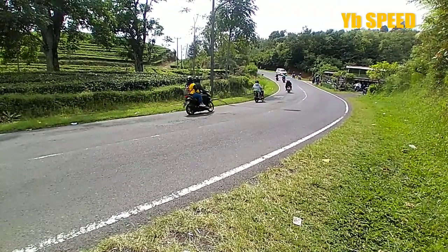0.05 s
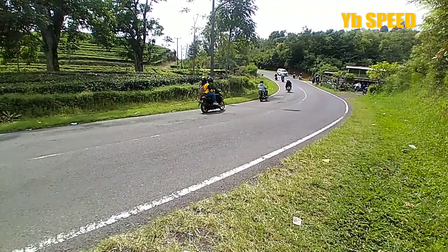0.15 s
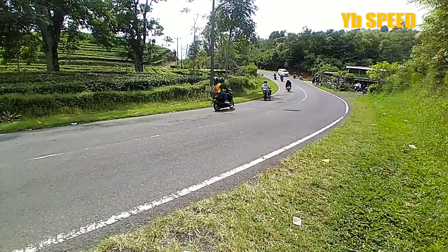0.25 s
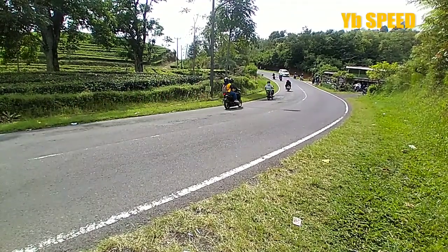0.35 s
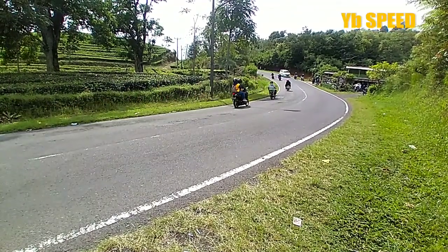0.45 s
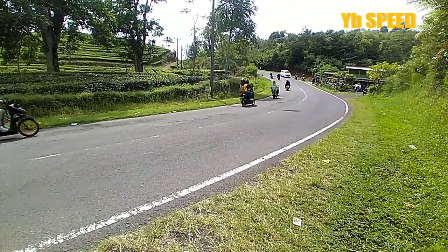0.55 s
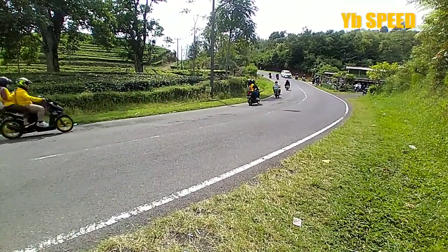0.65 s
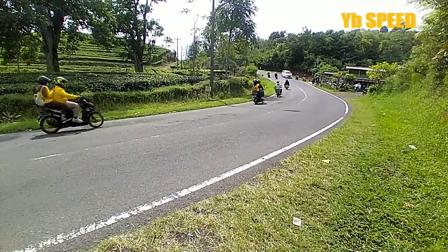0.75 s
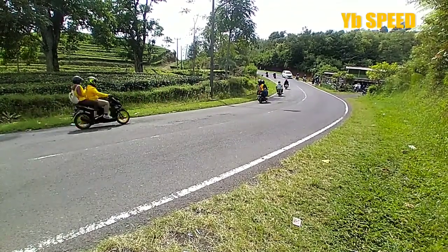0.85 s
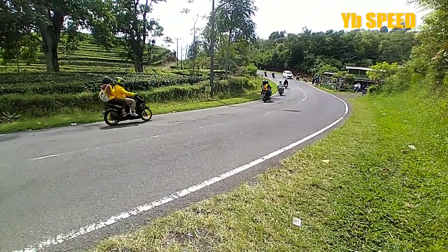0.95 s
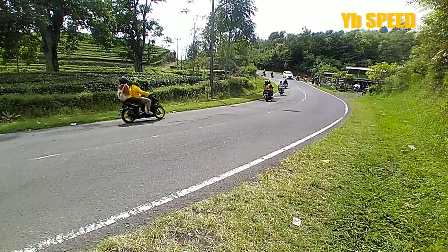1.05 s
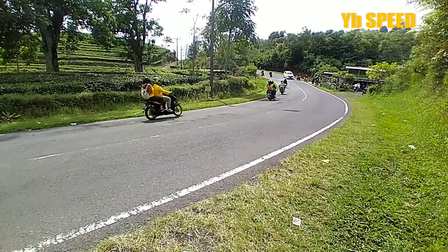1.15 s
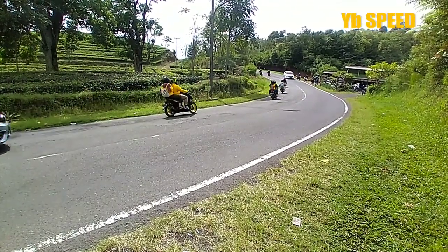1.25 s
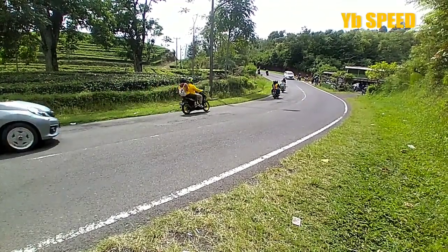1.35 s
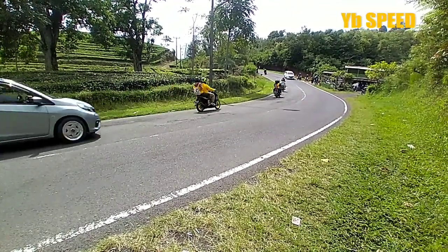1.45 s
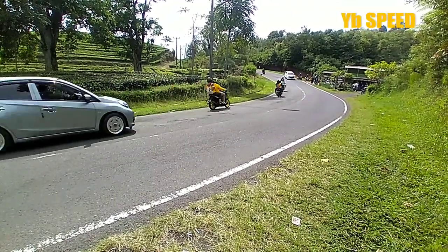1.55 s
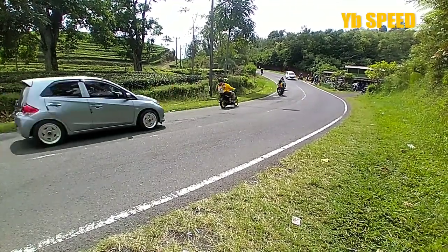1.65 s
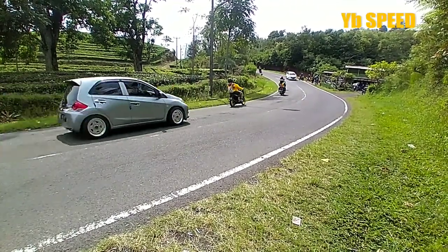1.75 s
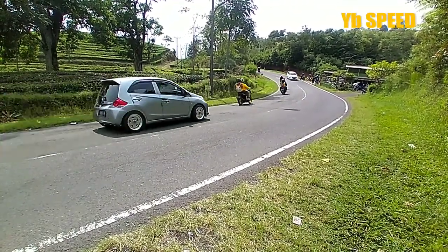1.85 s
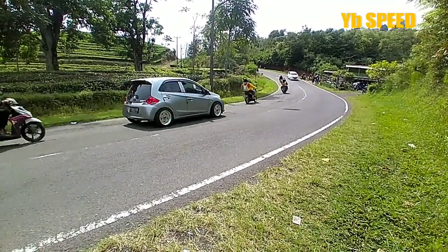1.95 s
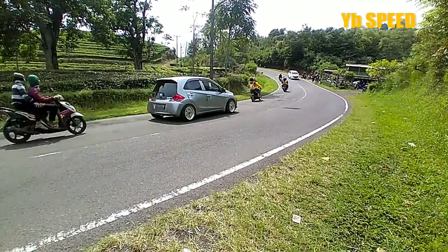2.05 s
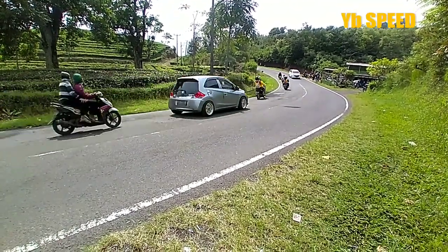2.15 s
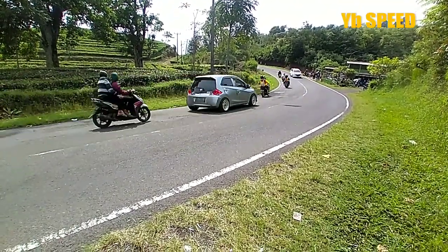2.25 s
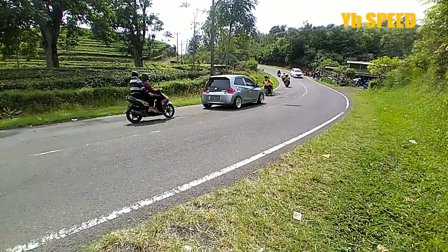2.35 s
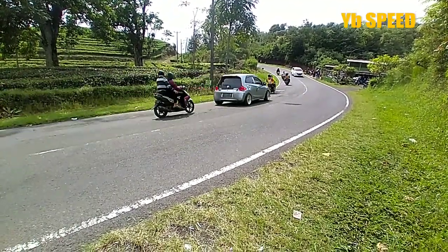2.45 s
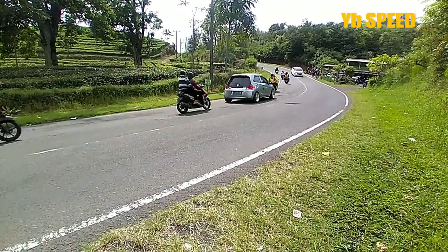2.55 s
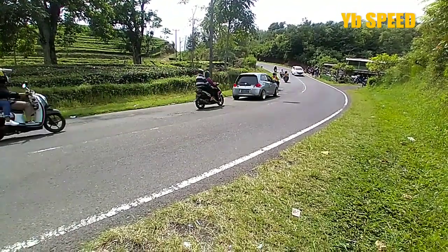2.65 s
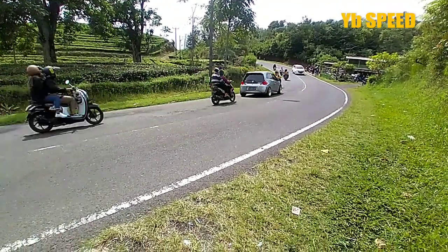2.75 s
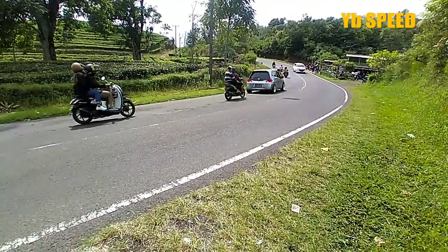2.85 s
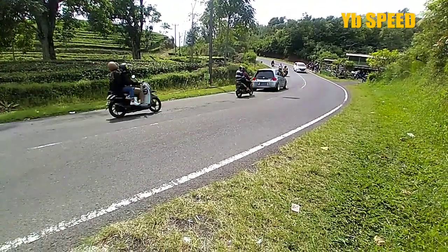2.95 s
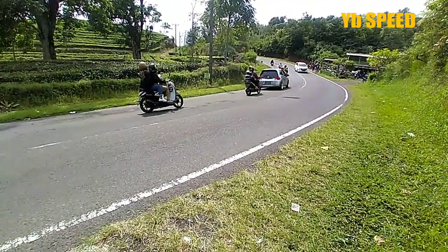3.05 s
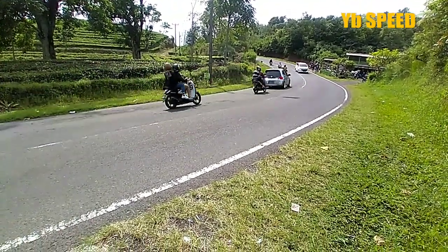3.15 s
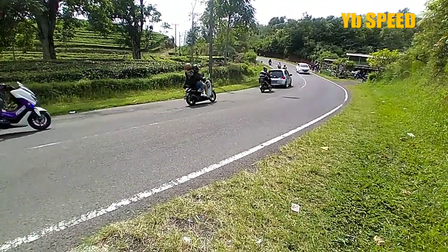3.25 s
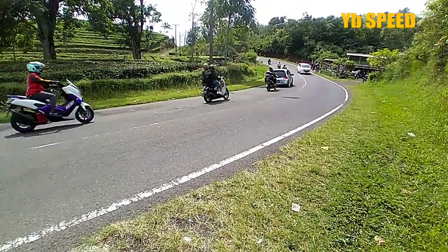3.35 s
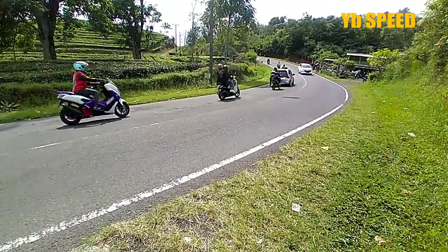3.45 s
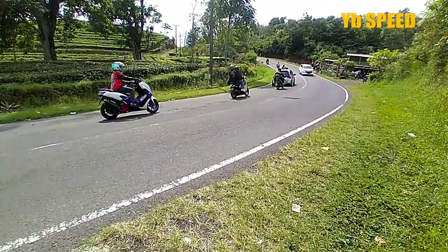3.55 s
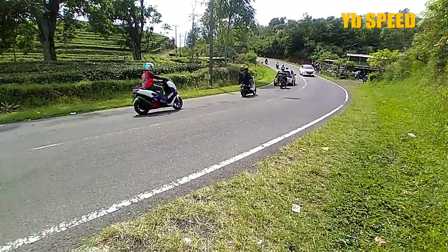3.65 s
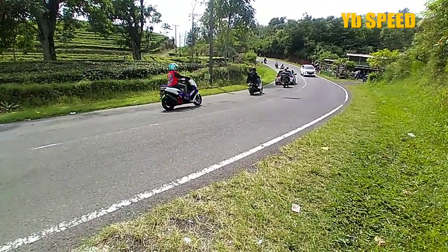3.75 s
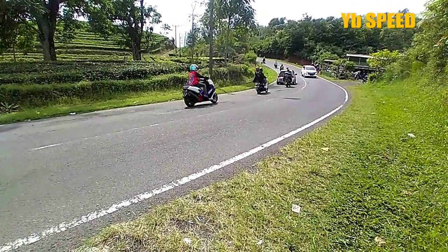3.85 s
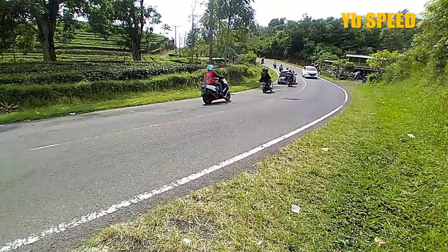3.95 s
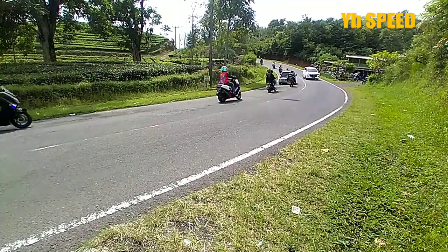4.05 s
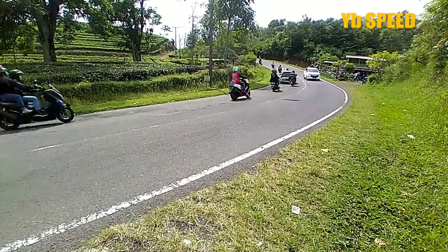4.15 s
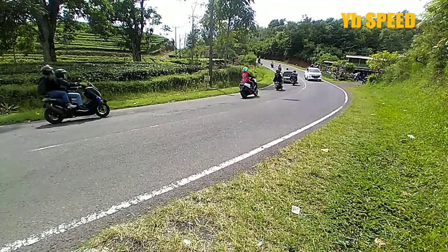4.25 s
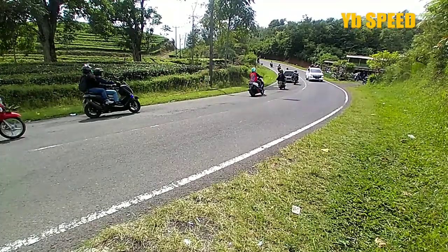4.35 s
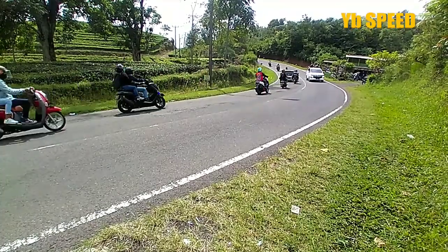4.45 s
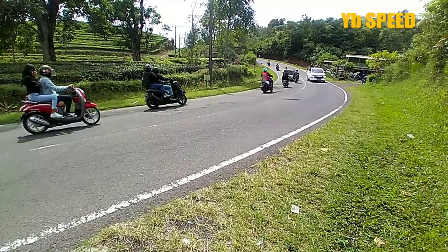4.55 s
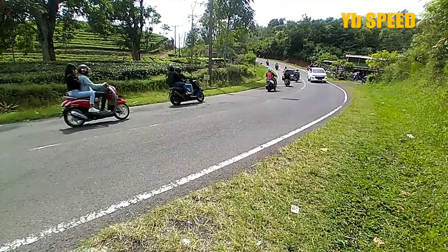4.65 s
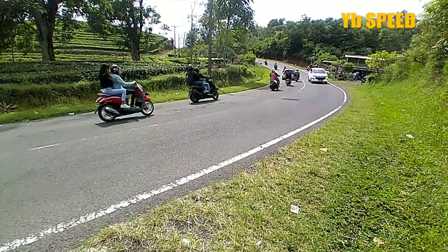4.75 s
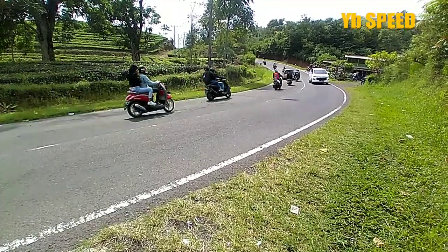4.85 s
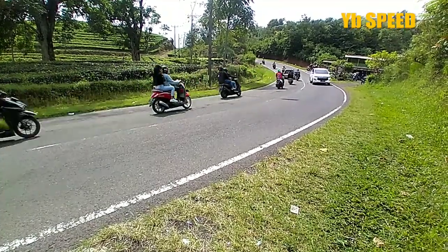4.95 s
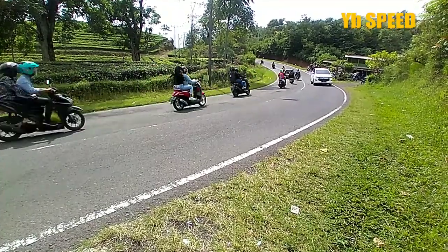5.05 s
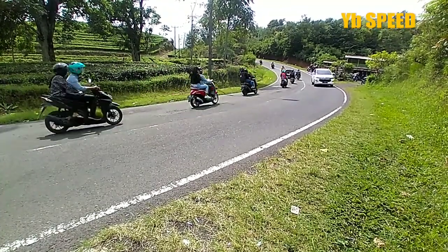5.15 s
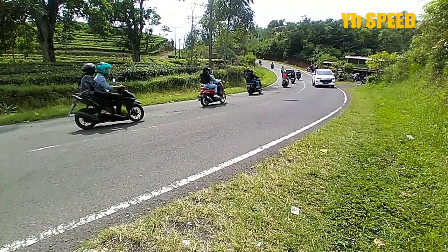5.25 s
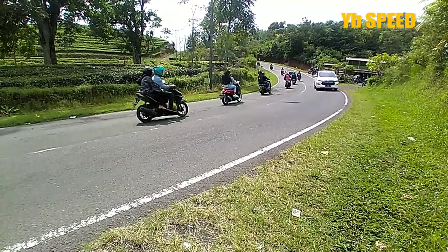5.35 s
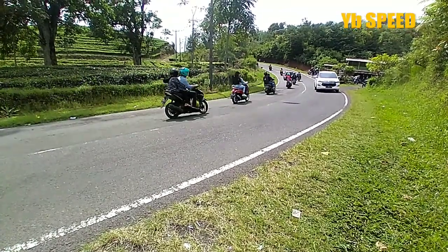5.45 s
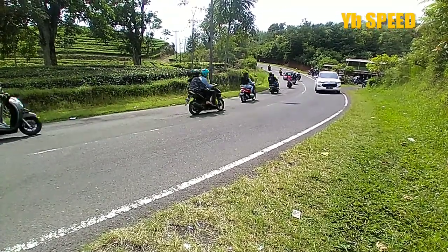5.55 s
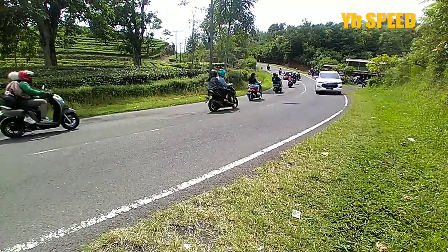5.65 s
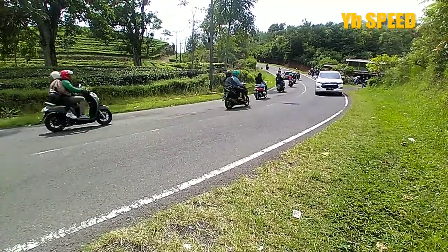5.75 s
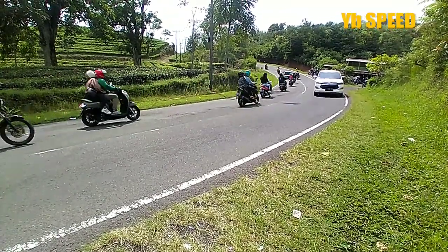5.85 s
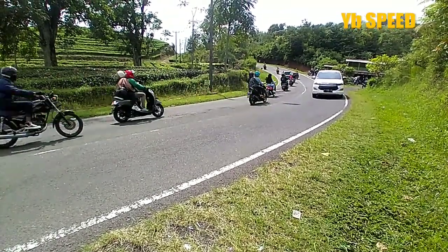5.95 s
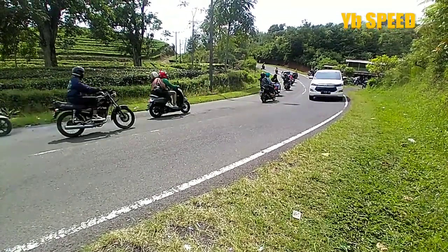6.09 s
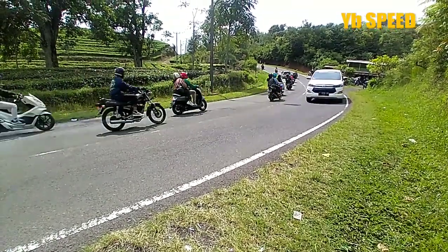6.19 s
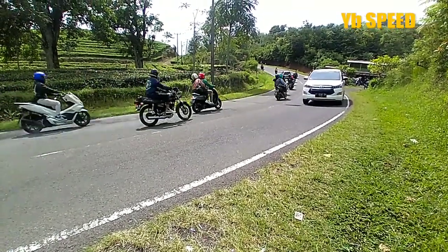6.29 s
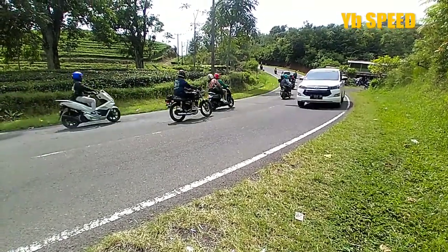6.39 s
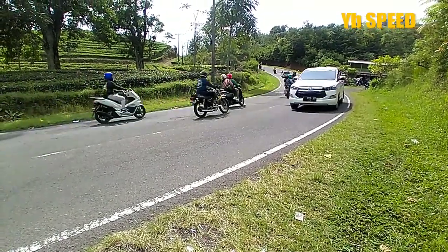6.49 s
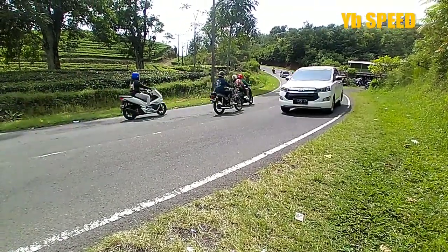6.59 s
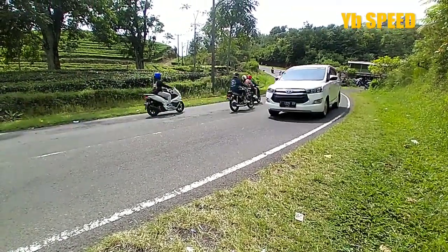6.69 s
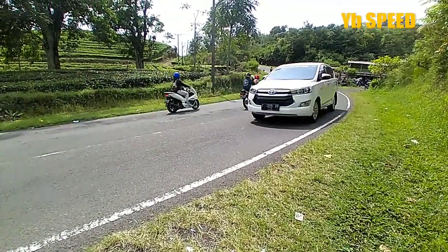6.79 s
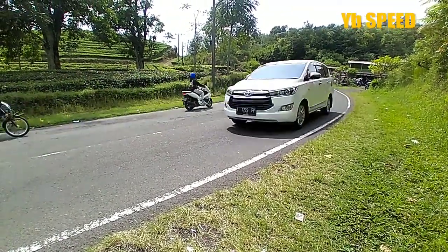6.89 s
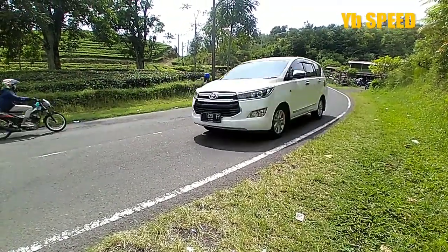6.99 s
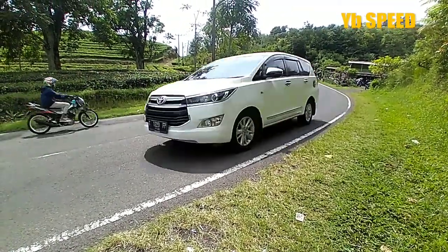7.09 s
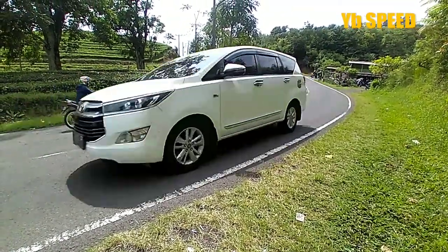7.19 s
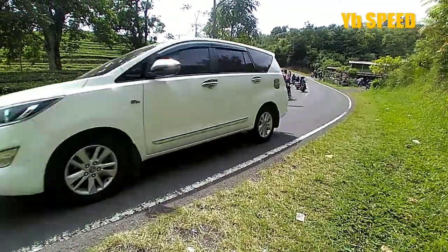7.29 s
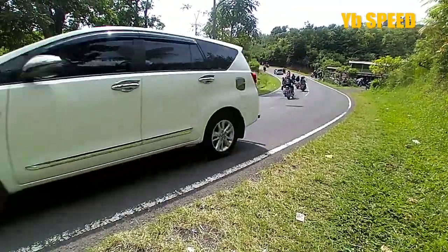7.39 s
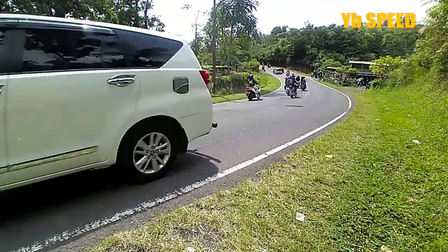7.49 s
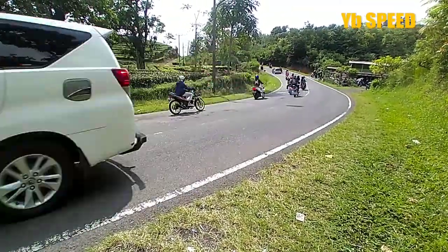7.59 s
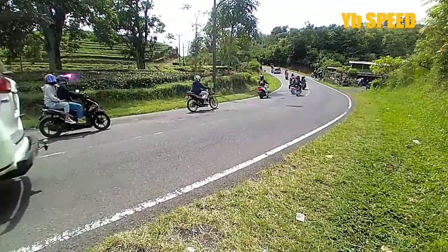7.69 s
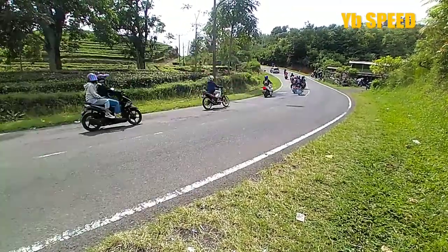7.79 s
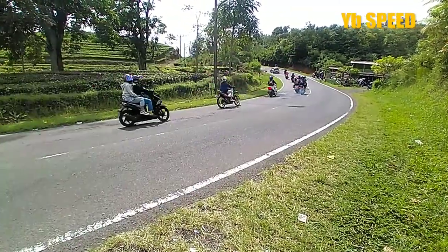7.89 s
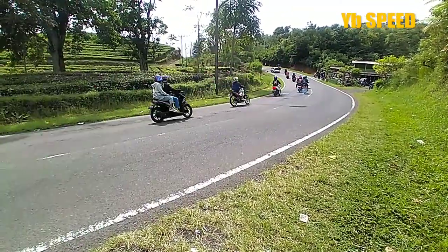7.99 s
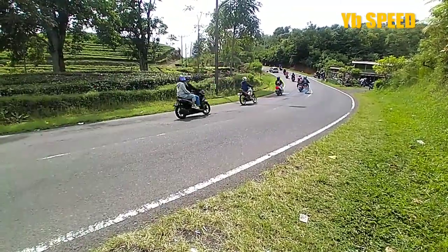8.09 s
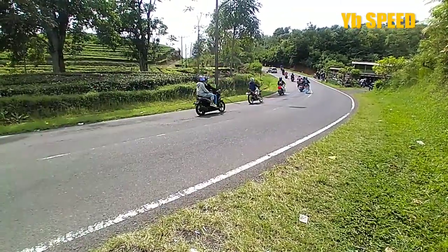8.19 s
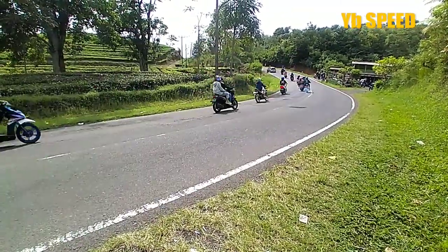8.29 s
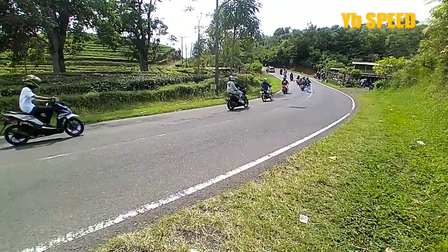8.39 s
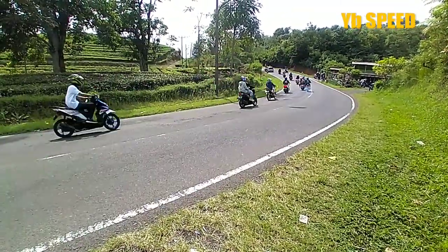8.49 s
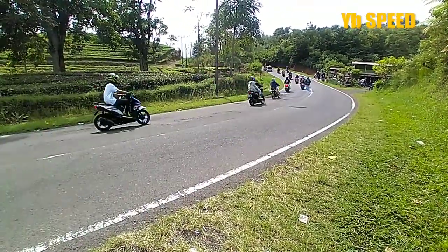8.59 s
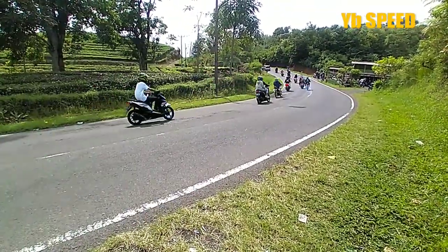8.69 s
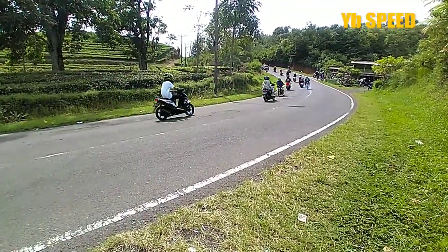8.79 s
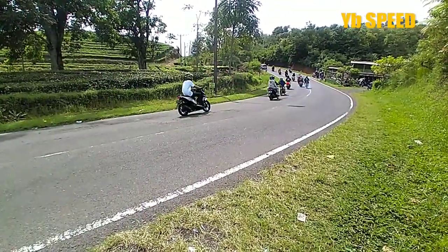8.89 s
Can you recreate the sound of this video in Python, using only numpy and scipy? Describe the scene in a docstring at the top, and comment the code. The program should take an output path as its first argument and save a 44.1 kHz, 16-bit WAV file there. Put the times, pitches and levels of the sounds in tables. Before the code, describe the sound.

Motorcycles and cars pass a roadside bend with swelling tyre hiss, then two loud single-cylinder motorcycles thump by close.

```python
"""Traffic at a roadside bend

Scooters, motorcycles and two cars pass a few metres from a pocket microphone with two ports (openings).
Two loud one-cylinder exhausts thump over distant ones, each firing making the pipe ring.
Road noise roars and hisses, coloured by each port, its narrow bands flickering in and out.
The bank behind scatters the bass."""
import sys
import numpy as np
from scipy import signal
from scipy.fft import rfft, irfft
from scipy.io import wavfile
from scipy.ndimage import uniform_filter1d

SR = 44100
rng = np.random.default_rng(int(sys.argv[2]) if len(sys.argv) > 2 else 0)


def store_pcm(level_fs):
    """Save levels as 16-bit WAV."""
    pcm = np.round(np.clip(level_fs, -1, 1) * 32767).astype(np.int16)
    wavfile.write(sys.argv[1], SR, np.atleast_2d(pcm).T)


N = 393813

# The second loud exhaust: (time [s], firing rate [Hz], level [dB], low ring centre [Hz],
# upper ring over level [dB], upper ring centre [Hz], boom over level [dB])
SECOND_ENGINE = [(7.1, 47.7, -37, 132, -25, 340, -34), (7.246, 47.63, -30, 130, -28, 445.5, -1),
                 (7.338, 49.34, -13.5, 150.5, -42, 596, -33), (7.42, 48.47, -22, 150, -40, 550, -14),
                 (7.538, 46.63, -20.5, 205, -17, 260, -26), (7.614, 46.54, -15.5, 145, -23, 298, -9),
                 (7.69, 46.23, -21, 162, -25, 300, -1.5), (7.79, 45.7, -22.5, 127, -37, 450, -9),
                 (7.85, 46.77, -17.5, 131, -45, 480, -22), (7.97, 45.05, -15, 160.2, -32, 262, -17),
                 (8.016, 45.28, -14, 152.5, -18.5, 450, -26), (8.1, 45.1, -12.5, 133.4, -32, 480, -26),
                 (8.24, 44.79, -16, 139.1, -11, 476.6, -11), (8.3, 44.76, -14, 146, -13, 473, -12),
                 (8.36, 44.15, -15, 143, -7.5, 346, -6), (8.454, 44.15, -17, 160, -5.5, 278, -6),
                 (8.58, 43.98, -15, 146, -14, 390, -10), (8.64, 43.28, -16, 154, -3, 253, -10),
                 (8.88, 44.33, -17.5, 174, 2, 270, -12), (8.93, 46.2, -18.5, 179.5, 3, 262.3, -9)]
# Swirling gas against the firings in each loud exhaust: (first [ratio], second [ratio])
GAS_SHARES = [.4, .28]


def undb(db):
    """Turn decibels into a gain."""
    return 10 ** (np.asarray(db) / 20)


def unit(x):
    """Scale to an average power of 1."""
    return x / np.sqrt(np.mean(x ** 2))


def curves(table):
    """A gate that is open while the table lasts, and its columns at every sample."""
    times, *columns = np.transpose(table)
    t = np.arange(N) / SR
    gate = uniform_filter1d(1. * ((t >= times[0]) & (t <= times[-1])), SR // 20, mode="nearest")
    return gate, [np.interp(t, times, column) for column in columns]


def band(x, lo_hz, hi_hz, order=2):
    """Keep what lies between two frequencies."""
    return signal.sosfilt(signal.butter(order, [lo_hz, hi_hz], "bandpass", fs=SR, output="sos"), x)


def shaped(x, points):
    """Colour a sound by (frequency [Hz], gain [dB]) points."""
    hz, db = np.transpose(points)
    f = np.maximum(np.fft.rfftfreq(N, 1 / SR), 1)
    return irfft(rfft(x) * undb(np.interp(np.log(f), np.log(hz), db)), N)


def walk(rate):
    """Glide to a new random value rate times a second; the spread is near 1."""
    return np.interp(np.arange(N) * rate / SR, np.arange(200), rng.standard_normal(200)) * 1.2


def firings(hz, jitter, scatter_db):
    """One pulse a cycle, uneven in timing and size; also the place in the cycle, 0 to 1."""
    turns = np.cumsum(hz) / SR
    starts = np.flatnonzero(np.diff(np.floor(turns)))
    timing, size = rng.standard_normal((700, 2))[:len(starts)].T
    starts += (jitter * timing * SR / hz[starts]).astype(int)
    pulses = np.zeros(N)
    pulses[np.clip(starts, 0, N - 1)] = undb(scatter_db * size)
    return pulses, turns % 1


def add_burst(out, start_s, db, t60, hz=None):
    """Add a sharp rise that fades 60 dB in t60 seconds; with hz, it carries a tone."""
    t = np.arange(SR // 5) / SR
    shape = np.exp(-np.log(1000) * t / t60) * (1 - np.exp(-t / 0.00054))
    tone = 1 if hz is None else np.sin(2 * np.pi * hz * t)
    i = int(start_s * SR)
    out[i:i + len(t)] += undb(db) * shape * tone


def traffic_rumble():
    """Distant traffic blurs into a low, gently wavering noise."""
    # Tone of the rumble: (frequency [Hz], relative level [dB])
    colour = [(15, -59), (25, -35), (91, -2), (139, -9), (171, 0), (205, -8), (436, -16), (700, -18.5),
              (910, -80), (1540, -120)]
    return undb(-41.5 + .8 * walk(6)) * unit(shaped(rng.standard_normal(N), colour))


def far_engines():
    """Steady firings, dulled by distance."""
    # One list for each engine: (time [s], firing rate [Hz], level [dB])
    engines = [
        [(0, 58.2, -45.5), (.6, 57.4, -46.5), (1.1, 59.24, -46), (2.2, 60.04, -49.5), (2.8, 59, -58)],
        [(2.4, 50, -83), (3, 52.1, -45.5), (3.7, 55.4, -46), (4.2, 59.37, -45), (4.7, 62.55, -42),
         (5.4, 64, -41.5), (5.9, 62.2, -46)],
        [(1.8, 39, -58), (2.2, 38.2, -74), (3.5, 38.66, -69), (4.5, 38.9, -53), (5.5, 38.7, -68),
         (5.8, 38, -58)],
        [(5.7, 36.24, -26.5), (6, 36.06, -26.5), (6.4, 36.05, -47), (6.8, 36.54, -37.5), (7.1, 36.4, -42.5),
         (7.4, 36.7, -57)],
    ]
    # Tone of a distant exhaust pipe: (frequency [Hz], relative level [dB])
    pipe = [(40, -30), (75, -4), (120, -3), (180, 0), (300, -2), (480, -7), (700, -20), (1100, -50),
            (2000, -120)]
    out = 0
    for engine in engines:
        gate, (hz, db) = curves(engine)
        pulses, _ = firings(hz, jitter=0.00087, scatter_db=2.0)
        out += gate * undb(db) * unit(shaped(pulses, pipe))
    return out


def tyre_swells():
    """Swells of tyre noise as traffic passes; their powers add, and the loudest set side and centres."""
    # (loudest at [s], fade time [s], roar [dB], whir [dB], rattle [dB], hiss [dB],
    # twice the left-minus-right level [dB], roar centre [Hz], rattle centre [Hz])
    swells = [(0, 0.18, -46, -56, -46, -31.5, 9.5, 1110, 4900),
              (.4, 0.14, -49, -59, -50, -38, 13, 1090, 4200),
              (0.885, 0.12, -45.5, -51, -46.5, -31.5, 1.5, 1050, 5800),
              (1.22, 0.73, -43, -50, -46, -39.5, 9, 1060, 4400),
              (1.64, 0.26, -42.5, -43, -31.5, -32.5, 0, 1010, 4300),
              (1.9, 0.27, -44, -37.5, -36, -28.5, -3.5, 1050, 4100),
              (2.22, 0.42, -35, -56, -34, -32, -4, 1080, 4700),
              (2.49, 0.22, -59, -43, -48, -26, 0, 1110, 5100),
              (3.06, 0.39, -39, -39.5, -42.5, -30.5, -0.5, 1130, 5050),
              (3.36, 0.15, -39.5, -41, -41, -34, -7, 1280, 4000),
              (3.64, 0.25, -35.5, -48, -40, -36, 2, 1230, 4600),
              (3.961, 0.19, -38, -34.5, -59, -32, -3.5, 1280, 4130),
              (4.2, 0.33, -34.5, -40.5, -46.5, -37, 0.5, 1060, 5200),
              (4.7, 0.81, -37, -36.5, -43, -30, -0.5, 1140, 5060),
              (5.17, 0.19, -32, -37, -35.5, -31, 1, 1300, 3030),
              (5.64, 0.32, -36, -33, -32.5, -23, -2.5, 1180, 3230),
              (6.1, 0.23, -37, -39, -35.5, -27, -1.5, 1190, 3440),
              (6.42, 0.18, -38.5, -64, -40, -28.5, 1.5, 869.6, 5100),
              (6.64, 0.36, -45, -39.5, -40, -26, -0.5, 890, 5645),
              (7.048, 0.29, -47.5, -64, -45.5, -29.5, -1, 1080, 6050),
              (7.418, 0.19, -32.5, -45, -68, -52, 3.5, 830, 5500),
              (7.691, 0.21, -37, -42.5, -38.5, -28, 2, 920, 5800),
              (7.98, 0.22, -43.5, -52, -43, -35, -1, 1340, 5500),
              (8.28, 0.16, -41, -41.5, -40, -32, 8, 1390, 5450),
              (8.5, 0.15, -39.5, -41, -41, -46, 3, 700, 5650),
              (8.78, 0.18, -39.5, -39.5, -42, -38, 0, 725, 5100)]
    # The road between swells: (roar [dB], whir [dB], rattle [dB], hiss [dB])
    background_db = [-71, -56.5, -57, -46]
    peak_s, fade_s, *zones_db, side_db, roar_hz, rattle_hz = np.transpose(swells)[:, :, None]
    t = np.arange(0, N + 256, 256) / SR
    width_s = np.where(t < peak_s, 0.53 * fade_s, fade_s)  # rises quicker than it fades
    shape = (1 + ((t - peak_s) / width_s) ** 2) ** -1.966
    power = undb(2 * np.array(zones_db)) * shape
    mean = lambda value, weight: (value * weight ** 2).sum(0) / (weight ** 2).sum(0)
    gains = np.sqrt(power.sum(1) + undb(2 * np.array(background_db))[:, None])
    rows = [*gains, mean(side_db, power.sum(0)), mean(roar_hz, power[0]), mean(rattle_hz, power[2])]
    return [np.interp(np.arange(N) / SR, t, row) for row in rows]


def port_noise():
    """Left and right noise: the hollow of each port passes its resonances and little between them."""
    # Resonances of each port: (frequency [Hz], width [Hz], gain [dB])
    left_modes = [(770, 210, -5), (1094, 435, -1.5), (1710, 640, -5.5), (2284, 320, -3), (3084, 630, -6),
                  (4600, 3300, -18), (9350, 700, 5.5), (10770, 2100, -2.5), (14800, 4300, -14.5)]
    right_modes = [(940, 220, -8), (1270, 250, -2.5), (1536, 146, -4), (2240, 560, -13.5), (3410, 240, -8),
                   (4295, 2900, -7.5), (5640, 1500, -7), (7010, 2700, -8), (8210, 1120, -3.5),
                   (9170, 420, 1.5), (9790, 350, 0), (10250, 280, -1), (11020, 470, -4),
                   (12300, 1400, -11.5), (14500, 3000, -18)]
    # What gets through between them: (left [dB], right [dB])
    floors_db = [-45, -21]
    f = np.fft.rfftfreq(N, 1 / SR)
    common = rng.standard_normal(N)
    sides = []
    for modes, floor_db, lag_s in zip((left_modes, right_modes), floors_db, (.0005, 0)):
        noise = .7 * np.roll(common, int(lag_s * SR)) + rng.standard_normal(N)
        peaks = sum(undb(2 * db) / (1 + (2 * (f - hz) / width) ** 2) ** 2 for hz, width, db in modes)
        sides.append(irfft(rfft(noise) * np.sqrt(undb(2 * floor_db) + peaks), N))
    return sides


def road_noise(beat, patchy_db, flicker_db, throb_db, focus_db):
    """Narrow strips of noise swell and drop out alone; roar, whir and rattle follow moving centres."""
    # The four zones of road noise: (roar [Hz], whir [Hz], rattle [Hz], hiss [Hz])
    zone_hz = [1000, 2100, 4400, 9500]
    # The moving whir: (time [s], centre [Hz])
    whir_path = [(0, 2280), (1.5, 2300), (1.9, 2080), (2.5, 2350), (3.8, 2190), (4.5, 1790), (5, 2100),
                 (5.7, 2450), (6.8, 2360), (7.3, 1600), (7.9, 1610), (8.05, 1470), (8.35, 1450),
                 (8.6, 2350), (8.93, 2350)]
    *levels, side_db, roar_hz, rattle_hz = tyre_swells()
    _, (whir_hz,) = curves(whir_path)
    noise = port_noise()
    # around 6 s the flicker evens out
    unevenness = 1 - .65 * np.exp(-((np.arange(N) / SR - 6.05) / .6) ** 4)
    zones, power = np.zeros((4, 2, N)), np.zeros((4, 1, N))
    for step, hz in enumerate(680 * 2 ** np.arange(0, 4.6, 1 / 10)):
        zone = np.argmin(abs(np.log(hz / np.array(zone_hz))))
        centre_hz = (roar_hz, whir_hz, rattle_hz, hz)[zone]
        boost_db = focus_db[zone] * np.exp(-(np.log2(hz / centre_hz) / .3) ** 2)
        shared_drift = walk(6)
        depth = unevenness * min(1, (2500 / hz) ** .4)  # the top hiss is smoother
        for side in range(2):
            drift_db = patchy_db * (0.73 * shared_drift + 0.84 * walk(8)) + flicker_db * walk(20)
            gain = undb(boost_db + depth * drift_db)
            strip = band(noise[side], hz * 2 ** -.056, hz * 2 ** .056)
            zones[zone, side] += (-1) ** step * gain * strip  # flipped so neighbours do not cancel
            power[zone] += gain ** 2 * np.mean(strip ** 2) / 2.5
    zones /= np.sqrt(uniform_filter1d(power, SR // 8))  # steady each zone before setting its level
    throb = undb(throb_db * unit(band(rng.standard_normal(N), 8, 45, order=1)))
    gains = np.array(levels) * throb
    gains[1:] *= undb(.8 * beat)  # the loud engines shake loose parts
    gains[2:] += np.array([[.1], [.4]]) * hiss_spits()
    lean = undb(np.array([side_db, -side_db]) / 4)
    return (gains[:, None] * zones).sum(0) * lean


def narrow_noise_bands():
    """A narrow band of road noise swells, holds and fades, wavering a little."""
    # (middle [s], length [s], centre [Hz], level [dB], left minus right [dB])
    bands = [(.3, 0.48, 1146, -48.5, 6), (1.15, 0.49, 1070, -43.5, 12), (1.85, 0.12, 1593, -45, 1),
             (1.856, 0.28, 2100, -38, 10), (1.878, .23, 3337, -41, -6), (2.29, 0.5, 1070, -37.5, 12),
             (2.6, 0.91, 2380, -44, 12), (3.651, 0.24, 1184, -38, 10), (4.06, 0.55, 2340, -37, 10),
             (4.138, 0.28, 832, -34, 10), (4.15, .45, 1255, -38, -1), (4.6, 0.24, 1770, -37, 10),
             (4.766, 0.32, 1073, -39, 5), (5.11, 0.11, 721, -36, 14), (5.35, 0.43, 1285, -32.5, 0),
             (6.03, 0.23, 1320, -38.5, -1), (6.45, 0.4, 936, -41, 2), (6.61, 0.11, 875, -34, -6),
             (7.553, 0.25, 856, -34, 12), (7.647, 0.48, 1571, -41, -1), (7.69, 0.37, 1130, -35, 9),
             (8.167, 0.35, 1480, -43, -6)]
    out, t = 0, np.arange(N) / SR
    half_width = 0.041  # share of the centre frequency
    for middle_s, length_s, hz, db, side_db in bands:
        noise = unit(band(rng.standard_normal((2, N)), hz * (1 - half_width), hz * (1 + half_width)))
        swell = np.exp(-abs(2 * (t - middle_s) / length_s) ** 3)
        lean = undb([[side_db / 4], [-3 * side_db / 4]])
        out += undb(db + 2.0 * walk(12)) * swell * noise * lean
    return out


def hiss_spits():
    """Brief jumps in gain that make the road hiss spit."""
    # (time [s], relative strength [dB], time to fade 60 dB [s])
    spits = [(0.8218, -23, 0.033), (0.853, -20, 0.031), (0.877, -14, 0.05), (0.9084, -24, 0.05),
             (5.4765, -20, 0.083), (5.634, -9, 0.03), (5.6984, -17, 0.032), (5.737, -9, 0.037),
             (5.8262, -22, 0.027)]
    out = np.zeros(N)
    for start_s, db, t60 in spits:
        add_burst(out, start_s, db, t60)
    return out


def wheel_knocks():
    """A wheel drops on a seam in the road: a short dull ring."""
    # (time [s], level [dB], pitch [Hz])
    knocks = [(1.498, -24, 590), (2.459, -28, 640), (4.05, -26.5, 583), (4.609, -22, 295),
              (4.628, -17, 228), (4.649, -21, 460)]
    out = np.zeros(N)
    for start_s, db, hz in knocks:
        add_burst(out, start_s, db, t60=.06, hz=hz)
    return out


def ring_gains(bands_hz, centre_hz, db_per_octave, waver_db):
    """Gains of total power 1 for bands that ring most near a moving centre and waver on their own."""
    gains = np.array([undb(-db_per_octave * abs(np.log2(hz / centre_hz)) + waver_db * walk(12))
                      for hz in bands_hz])
    return gains / np.sqrt((gains ** 2).sum(0))


def exhaust(engine, snarl, edges, gas_share, puff_db, puff_hz,
            low_bands, low_db_per_octave, high_db_per_octave, waver_db):
    """Firings and swirling gas ring the pipe, and a puff follows each firing. Gives (sound, beat)."""
    gate, (hz, db, low_hz, high_db, high_hz, boom_db) = curves(engine)
    # seven bands, from the bottom up: boom, low ring bands, upper ring bands, snarl
    mids = np.sqrt(np.multiply(edges[1:], edges[:-1]))
    low = ring_gains(mids[1:low_bands + 1], low_hz, low_db_per_octave, waver_db)
    high = ring_gains(mids[low_bands + 1:-1], high_hz, high_db_per_octave, waver_db)
    gains = undb(db) * np.vstack([undb(boom_db), low, undb(high_db) * high])
    _, (snarl_db,) = curves(snarl)
    snarl_gain = undb(snarl_db + waver_db * walk(9))
    pulses, phase = firings(hz, jitter=.008, scatter_db=1.2)
    drive = unit(pulses) + gas_share * rng.standard_normal(N)
    body = 0
    for k, gain in enumerate([*gains, snarl_gain]):
        ring = unit(band(drive, edges[k], edges[k + 1], order=3))
        # the pulse reaches each band later along the pipe, spreading the thump over the cycle
        body += gain * np.roll(ring, int(k * .0068 * SR))
    puff = unit(np.exp(-phase / 0.37) * band(rng.standard_normal(N), puff_hz / 1.14, puff_hz * 1.23))
    return gate * (body + snarl_gain * undb(puff_db) * puff), gate * np.cos(2 * np.pi * phase)


def first_exhaust():
    """The first loud machine thumps past, its firings speeding up."""
    # (time [s], firing rate [Hz], level [dB], low ring centre [Hz],
    # upper ring over level [dB], upper ring centre [Hz], boom over level [dB])
    engine = [(5.2, 37.1, -37.5, 270, 0, 385, -15), (5.33, 36, -37, 159, -36, 385, -15),
              (5.48, 35.94, -35, 134, -30, 460, -14), (5.525, 35.92, -24, 223, -19, 517, -31),
              (5.6, 36.88, -20.5, 126, -19, 385, -14), (5.66, 37.91, -21.5, 224, -5, 400, -19),
              (5.82, 39.58, -16.5, 166, -7, 383, -22), (6.05, 41.48, -20, 247, -8.5, 394, -26),
              (6.2, 42.8, -17.5, 220, -9.5, 402, -29), (6.42, 42.6, -17, 211.2, -14.5, 436, -23),
              (6.49, 42.98, -28.5, 280, 5, 484, -25), (6.56, 43.64, -15.5, 218, -13.5, 420, -35),
              (6.69, 43.8, -41.5, 224, 2.5, 425, -11), (6.75, 43.9, -21.5, 217, -9, 499.6, -28),
              (6.81, 44.1, -35, 198, -9, 449.7, -14), (6.86, 43.9, -25, 152, -18, 420, -22),
              (6.93, 43.36, -36, 148, -17, 454, -7), (7.056, 43.8, -27.5, 131, -28, 449, -30),
              (7.15, 45.2, -39, 158.4, -18, 451, -12)]
    # The pipe's highest band: (time [s], level [dB])
    snarl = [(5.2, -53), (5.258, -59), (6.008, -41), (6.252, -54), (6.286, -34.5), (6.948, -74.5),
             (7.15, -47)]
    # Limits of the pipe's seven bands [Hz]
    edges = [60, 110, 160, 240, 330, 450, 600, 800]
    return exhaust(engine, snarl, edges, GAS_SHARES[0], puff_db=-11, puff_hz=1160,
                   low_bands=3, low_db_per_octave=25.5, high_db_per_octave=33.0, waver_db=3.0)


def valve_ticks():
    """The valves of a small engine give a short metallic rasp each cycle, mostly on the right."""
    # Ticking, which dips while a car screens it: (time [s], level before the side gains [dB])
    levels = [(6.85, -57), (7.07, -42), (7.32, -38.5), (7.42, -56), (7.64, -58), (7.8, -38), (7.96, -36),
              (8.1, -45), (8.22, -35.5), (8.34, -40), (8.75, -51)]
    # (time [s], tick rate [Hz])
    rates = [(6.85, 44.5), (7.07, 45.8), (7.66, 46.4), (7.98, 45.3), (8.19, 44.5), (8.4, 43.9),
             (8.75, 43.9)]
    gate, (db,) = curves(levels)
    _, (hz,) = curves(rates)
    pulses, _ = firings(hz, jitter=.01, scatter_db=1.5)
    tails = signal.lfilter([1], [1, -np.exp(-1 / (.004 * SR))], pulses)  # 4 ms decay
    rasp = unit(band(tails * rng.standard_normal(N), 5160, 5760))
    return gate * undb(db) * rasp * undb([[-10], [3]])


def second_exhaust():
    """The second loud machine follows with a deeper thump and snarls near the end."""
    # The pipe's highest band: (time [s], level [dB])
    snarl = [(7.1, -60), (7.9, -70), (8.22, -63), (8.34, -38), (8.57, -33.5), (8.7, -39), (8.88, -31),
             (8.93, -43)]
    # Limits of the pipe's seven bands [Hz]
    edges = [60, 110, 160, 240, 285, 400, 580, 800]
    return exhaust(SECOND_ENGINE, snarl, edges, GAS_SHARES[1], puff_db=-12, puff_hz=1330,
                   low_bands=2, low_db_per_octave=29.5, high_db_per_octave=26.5, waver_db=2.25)


def pipe_bark():
    """Each firing knocks a short ring out of the second pipe's mouth, blurred by a little gas."""
    # (time [s], level [dB])
    levels = [(8.25, -60), (8.53, -42), (8.58, -50), (8.67, -38), (8.75, -51), (8.86, -39), (8.93, -39)]
    gate, (db,) = curves(levels)
    _, (hz, *_) = curves(SECOND_ENGINE)
    pulses, _ = firings(hz, jitter=0.0083, scatter_db=1.0)
    tails = signal.lfilter([1], [1, -np.exp(-1 / (.003 * SR))], pulses)  # 3 ms decay
    gas = unit(tails * rng.standard_normal(N))
    return gate * undb(db) * unit(band(unit(pulses) + .6 * gas, 1130, 1310))


def bank_echoes(x, echo_db, low_cut_hz, buffet_db):
    """Echoes off the grassy bank shift as the traffic moves and reach the two ports differently."""
    n = np.arange(N)
    echo = sum(np.interp(n - SR * (lag_s + 0.0018 * walk(0.94)), n, x) for lag_s in (.011, .019, .031))
    low_cut = signal.butter(1, low_cut_hz, "highpass", fs=SR, output="sos")
    echo = undb(echo_db) * signal.sosfilt(low_cut, echo)
    # air stirred by the loud machines buffets each port on its own
    loudness = np.sqrt(uniform_filter1d(x ** 2, SR // 10))
    gusts = np.array([unit(band(rng.standard_normal(N), 30, 52)) for _ in range(2)])
    left = np.roll(x, int(0.00032 * SR))  # bass bends round the housing and lags less than road noise
    return np.array([left + echo, x - echo]) + undb(buffet_db) * loudness * gusts


def scene():
    """The low sounds echo off the bank; road noise, ticks and bark arrive directly."""
    rumble = traffic_rumble()
    first, first_beat = first_exhaust()
    second, second_beat = second_exhaust()
    low = first + second + far_engines() + rumble + wheel_knocks()
    road = road_noise(first_beat + second_beat, patchy_db=3.0, flicker_db=5.0, throb_db=1.22,
                      focus_db=[11.0, 5.0, 7.0, 0])
    bass = bank_echoes(low, echo_db=-17.5, low_cut_hz=152, buffet_db=-26)
    return bass + road + narrow_noise_bands() + valve_ticks() + pipe_bark()


def record(dry):
    """The recorder rounds the loudest peaks and cuts the highest treble."""
    ceiling, top_hz = .45, 15500
    rounded = ceiling * np.tanh(dry / ceiling)
    return signal.sosfilt(signal.ellip(14, .2, 70, top_hz, fs=SR, output="sos"), rounded)


dry = scene()
out = record(dry)
store_pcm(out)
```